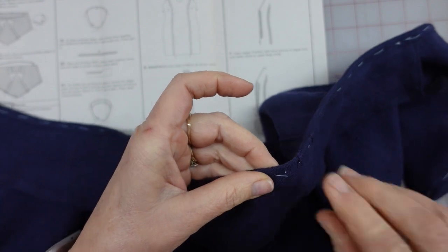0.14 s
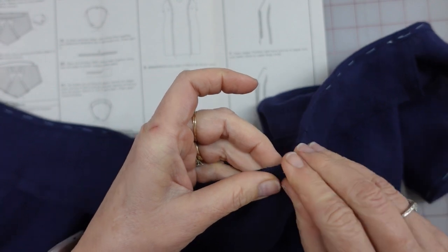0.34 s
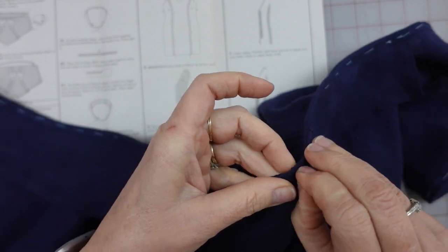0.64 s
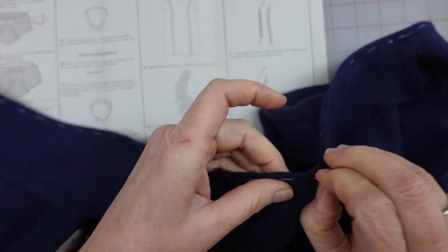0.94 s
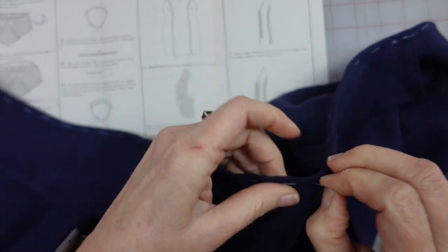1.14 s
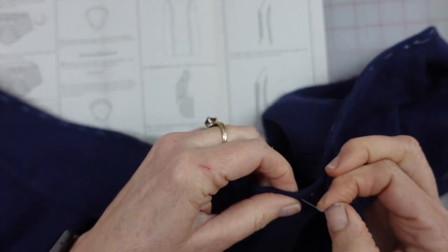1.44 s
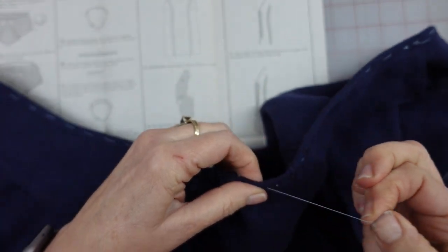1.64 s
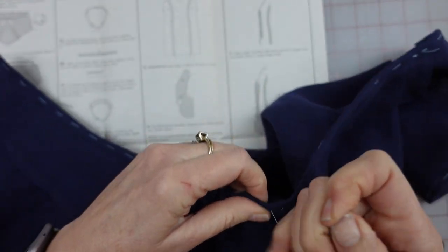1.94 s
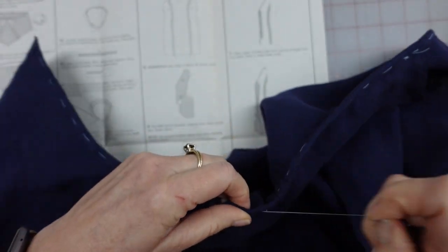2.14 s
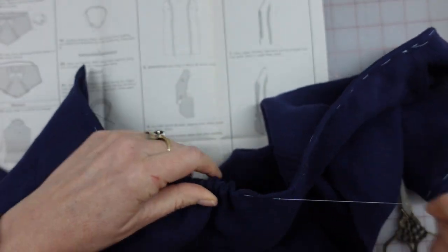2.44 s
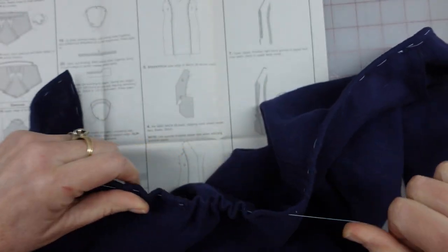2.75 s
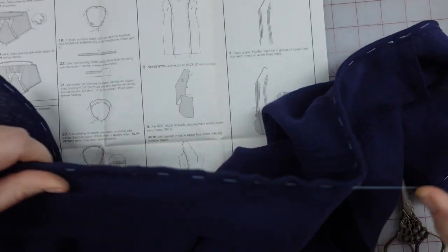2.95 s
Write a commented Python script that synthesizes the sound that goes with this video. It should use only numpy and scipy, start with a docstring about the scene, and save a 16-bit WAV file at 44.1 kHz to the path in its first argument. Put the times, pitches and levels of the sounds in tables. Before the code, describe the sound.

Hand-sewing thread rasps through fabric, close-miked in a small quiet room. A short clatter of scissors set down opens it, then light cloth handling, two hissing pulls, bunching with ticks, and a last bright pull.

```python
"""A thread is drawn through linen in three long hissing pulls: hand sewing, close to the microphone.
At the start scissors clatter as they are put down on the table; fingers brush and bunch the cloth.
Fibres tick, the thread snaps taut once, the cloth bumps softly, and a quiet room hums thinly behind.
Friction is dense random clicks, filtered and shaped by hand speed; bumps and scissors are decaying
sines; ticks are noise bursts. Both channels are nearly the same, with a short room echo."""
import sys
import numpy as np
from scipy import signal
from scipy.fft import rfft, irfft
from scipy.io import wavfile
from scipy.ndimage import uniform_filter1d

SR = 44100
rng = np.random.default_rng(int(sys.argv[2]) if len(sys.argv) > 2 else 0)


def log_audio(samples):
    """Write samples as a 16-bit WAV file to the path given in sys.argv[1]."""
    # one column per channel
    frames = np.atleast_2d(samples).T
    # limit to full scale, then quantise
    limited = np.clip(frames, -1, 1)
    pcm = np.round(limited * 32767).astype(np.int16)
    wavfile.write(sys.argv[1], SR, pcm)


N = 136710
T = np.arange(N) / SR  # seconds
SNAGS_PER_S = 7000  # fibres caught per second by a light touch


def amp(db):
    """Decibels to gain."""
    return 10 ** (np.asarray(db) / 20)


def unit(x):
    """Scale to rms 1."""
    return x / np.sqrt(np.mean(x ** 2))


def colour(x, points):
    """Causal minimum-phase filter through (Hz, dB) points, of unit power gain."""
    hz, db = np.array(points, float).T
    size = 2 * N
    f = np.maximum(np.fft.rfftfreq(size, 1 / SR), 1)
    gain = unit(amp(np.interp(np.log(f), np.log(hz), db)))
    # folding the cepstrum onto positive time makes the filter causal
    cepstrum = irfft(np.log(gain))
    cepstrum[1:N] *= 2
    cepstrum[N + 1:] = 0
    response = np.exp(rfft(cepstrum))
    return irfft(rfft(x, size) * response)[:N]


def walk(rate_hz):
    """Smooth random wander of rms 1, heading for a new value rate_hz times a second."""
    hold = max(int(SR / rate_hz), 2)
    steps = rng.standard_normal(N)[np.arange(N) // hold]
    return unit(uniform_filter1d(steps, hold))


def stroke(start_s, end_s, attack_s, release_s):
    """Speed of a hand movement: eases in, holds, eases out."""
    rise = (T - start_s) / attack_s
    fall = (end_s - T) / release_s
    ramp = np.clip(np.minimum(rise, fall), 0, 1)
    return np.sin(ramp * np.pi / 2) ** 1.2


def snags(rate_hz, spread_db):
    """Fibres slipping one by one: dense clicks, most small and a few large, rms 1."""
    size = amp(spread_db * np.minimum(rng.exponential(size=N), 5))
    slips = rng.random(N) < rate_hz / SR
    return unit(slips * size * rng.choice([-1, 1], N))


def burst(time_s, decay_s):
    """A short crackle of random signs, of peak near 1, dying away exponentially."""
    age = np.maximum(T - time_s, 0)
    return (T >= time_s) * np.exp(-age / decay_s) * rng.choice([-1, 1], N)


def room_tone():
    """Quiet, gently swaying air noise and the thin whine of an appliance, its pitches wavering."""
    # spectrum of the air in the room: freq_hz, relative_db
    air_spectrum = [(25, -1.5), (60, 2.5), (130, -0.5), (250, -2.5), (400, -1.5), (530, -1.5), (720, -6),
                    (1100, -9.5), (1600, -9), (2100, -11.5), (3000, -17), (5000, -16), (7500, -14.5),
                    (9300, -12.5), (11500, -18), (15500, -23)]
    # partials of the whine: freq_hz, level_db
    whine_partials = [(388, -61), (861, -60.5), (1249, -57.5), (2110, -65.5), (3747, -68), (4613, -68.5),
                      (5001, -66.5), (6250, -66)]
    air_db, sway_db = -44.5, 1.1
    air = colour(rng.standard_normal(N), air_spectrum) * amp(air_db + sway_db * walk(6.65))
    whine = 0
    for hz, db in whine_partials:
        cycles = np.cumsum(hz + 3 * walk(24.95)) / SR
        whine = whine + amp(db) * np.sqrt(2) * np.sin(2 * np.pi * cycles)
    return air + whine


def folds():
    """Layers of cloth drag over each other with a dull, lumpy rustle."""
    # folds shifted by the hands: start_s, end_s, attack_s, release_s, level_db, centre_hz
    fold_moves = [(0., 0.756, 0.025, 0.52, -37, 567), (0.61, 0.882, 0.088, 0.16, -40.5, 443),
                  (1.506, 1.73, 0.07, .05, -46, 486), (1.691, 1.956, 0.032, 0.2, -41, 530),
                  (1.94, 2.161, 0.038, 0.15, -35, 495), (2.125, 2.554, 0.053, 0.19, -41, 462),
                  (2.496, 2.737, 0.054, 0.084, -43, 430), (2.806, 3.062, 0.071, 0.15, -39, 500),
                  (3.022, 3.15, 0.084, .03, -38, 406)]
    # spectrum of any fold: multiple_of_centre, relative_db
    fold_shape = [(.06, -8.5), (.25, -3.5), (.5, -1), (.7, -2.5), (1, 2), (1.5, -4), (2.4, -12.5),
                  (6, -23.5), (24, -48)]
    out = 0
    for start, end, attack, release, db, hz in fold_moves:
        lumpy = amp(db + 0.72 * walk(45))
        drag = snags(2500, spread_db=2.5) * stroke(start, end, attack, release) * lumpy
        out = out + colour(drag, [(hz * ratio, level) for ratio, level in fold_shape])
    return out


def fingers():
    """Skin and needle graze the linen: a light, grainy hiss and the dry rasp of gathering cloth."""
    # strokes over the linen: start_s, end_s, attack_s, release_s, hiss_db, rasp_db
    finger_strokes = [(0., 0.375, .05, 0.22, -49, -51), (.12, 0.46, .06, 0.29, -64, -51.5),
                      (0.404, 0.658, 0.071, .015, -50.5, -62), (0.707, 0.917, 0.079, 0.039, -47, -68),
                      (1.127, 1.332, 0.025, 0.14, -42, -57), (1.163, 1.214, 0.044, .01, -39, -62),
                      (1.77, 1.874, 0.049, 0.027, -38, -56), (1.858, 2.022, 0.017, 0.12, -43, -49),
                      (2.098, 2.358, 0.12, 0.053, -35, -35.5), (2.335, 2.57, 0.012, 0.058, -43, -47),
                      (2.533, 2.68, .015, 0.11, -39, -41), (2.649, 2.84, 0.033, 0.031, -43, -47),
                      (2.715, 2.753, 0.024, 0.031, -47, -45.5)]
    # spectrum of the hiss: freq_hz, relative_db
    graze_spectrum = [(2500, -23.5), (5000, -12), (5900, -7.5), (7500, 0.5), (9000, 4), (10200, 4),
                      (11000, -5), (13000, -7.5), (15500, -13)]
    # spectrum of cloth gathering under the fingers: freq_hz, relative_db
    gather_spectrum = [(500, -11), (1200, -9.5), (1900, -8.5), (2200, 0.5), (2550, -2), (3000, -7),
                       (4000, -7.5), (4900, -9), (5700, -2.5), (6400, -4.5), (9000, -22.5)]
    uneven = amp(1.0 * walk(60))
    out = 0
    for column, spectrum in enumerate((graze_spectrum, gather_spectrum)):
        speed = sum(stroke(*row[:4]) * amp(row[4 + column]) for row in finger_strokes)
        friction = snags(SNAGS_PER_S, spread_db=2.0) * speed * uneven
        out = out + colour(friction, spectrum)
    return out


def scissors():
    """Several quick contacts on the table, each a crack and a short ring, some duller than others."""
    # contacts as the scissors settle: time_s, level_db, hardness_hz (low-pass corner)
    contacts = [(.0005, 3.5, 1500), (.005, 0.5, 4000), (0.0144, -2, 3500), (0.0203, 2.5, 1390),
                (0.027, -3.5, 2500), (0.04, -2.5, 1800), (.043, -12, 2800), (0.05, -3.5, 1400),
                (0.059, -11, 3000), (0.082, -8.5, 1500)]
    # ringing modes of the metal: freq_hz, relative_db, t60_s
    metal_modes = [(550, -11.5, 0.28), (690, -15, 0.19), (910, -11.5, 0.16), (1074, 1.5, 0.16),
                   (1114, -2.5, 0.092), (1258, -0.5, 0.093), (1403, -5, .10), (1835, -22, 0.072),
                   (1995, -3, 0.14), (2440, -9, 0.044), (2680, -20, 0.06)]
    # spectrum of the crack: freq_hz, relative_db
    crack_spectrum = [(100, -11), (500, -2), (1100, 1), (2700, 2.5), (3700, -12.5), (6500, -9),
                      (12000, -47)]
    ring_db, crack_db, crack_decay_s = -28, -21.5, .007
    out = 0
    for time, db, hard_hz in contacts:
        age = np.maximum(T - time, 0)
        ring = 0
        for hz, level, t60 in metal_modes:
            # each contact excites the modes slightly off pitch, with either sign
            detuned_hz = hz * (1 + 0.0084 * rng.standard_normal())
            mode = amp(level - 60 * age / t60) * np.sin(2 * np.pi * detuned_hz * age)
            ring = ring + mode * rng.choice([-1, 1])
        crack = colour(burst(time, crack_decay_s), crack_spectrum)
        hit = amp(ring_db) * ring + amp(crack_db) * crack
        out = out + amp(db) * signal.lfilter(*signal.butter(1, hard_hz, fs=SR), hit)
    return out


def ticks():
    """Fibres let go with a tiny bright snap, or several at once with a short crackle."""
    # fibres catching and letting go: time_s, energy_db, decay_s
    releases = [(0.098, -18, .0005), (.897, -22, .00003), (1.881, -19, .0007), (2.015, -18, .00003),
                (2.4101, -6, .00002), (2.5883, -9, 0.00004), (2.644, -5.5, 0.0042), (2.738, -15.5, 0.0018)]
    # spectrum of the snap: freq_hz, relative_db
    snap_spectrum = [(500, -15), (2500, -8), (5000, -18), (7000, -4), (8700, 0.5), (10000, -5),
                     (12000, -13), (15500, -23)]
    out = 0
    for time, db, decay in releases:
        snap = burst(time, decay)
        out = out + amp(db) * snap / np.sqrt(np.sum(snap ** 2))
    return colour(out, snap_spectrum)


def slides():
    """Needle and slack thread slide slowly through the weave with a softer, lower hiss."""
    # slow movements: start_s, end_s, attack_s, release_s, level_db
    slow_moves = [(0.874, 1.081, 0.11, .04, -41.5), (1.377, 1.52, .09, 0.031, -43.5),
                  (1.463, 1.63, 0.077, 0.056, -35)]
    # spectrum of the hiss: freq_hz, relative_db
    slack_spectrum = [(2500, -12.5), (4600, -11), (5600, -0.5), (6400, -0.5), (7800, 0.5), (9500, -0.5),
                      (11000, -8.5), (13000, -11), (15500, -18)]
    speed = sum(stroke(*row[:4]) * amp(row[4]) for row in slow_moves)
    return colour(snags(2 * SNAGS_PER_S, spread_db=3.0) * speed, slack_spectrum)


def bumps():
    """The cloth tugs tight or drops on the table: a heavily damped swing."""
    # bumps and tugs of cloth and thread: time_s, level_db, pitch_hz, t60_s
    swings = [(1.199, -27, 109, 0.028), (1.645, -28.5, 30.4, 0.11), (1.880, -33.5, 806, 0.011),
              (2.048, -26.5, 66, 0.075), (2.116, -24.5, 108, 0.039), (2.23, -27.5, 320, 0.023),
              (2.6425, -9.5, 410, 0.0049), (2.656, -30, 50, 0.052), (2.794, -30, 34.5, 0.076)]
    out = 0
    for time, db, hz, t60 in swings:
        age = np.maximum(T - time, 0)
        onset = 2 * (1 - np.exp(-2 * age * hz))  # soft start
        out = out + amp(db - 60 * age / t60) * np.sin(2 * np.pi * hz * age) * onset
    return out


def thread():
    """The twisted thread scrapes over the weave, unevenly, louder with speed."""
    # pulls: start_s, end_s, attack_s, release_s, hiss_db, rasp_db, sizzle_db
    thread_pulls = [(1.498, 1.757, 0.06, 0.059, -34.5, -45.5, -45),
                    (1.976, 2.351, 0.074, 0.17, -27.5, -40, -37),
                    (2.794, 3.133, 0.072, 0.08, -32.5, -52, -33.5)]
    # spectrum of the main hiss: freq_hz, relative_db
    hiss_spectrum = [(2500, -16), (4800, -15.5), (5650, -1.5), (6400, -1.5), (7100, 0.5), (7900, 2.5),
                     (8600, 1), (9700, 2.5), (10900, -6), (13000, -11), (15500, -16)]
    # spectrum of the lower rasp: freq_hz, relative_db
    rasp_spectrum = [(300, -11.5), (1000, -8), (1600, -3), (2300, 3.5), (3200, -4), (4300, 0.5), (5600, -3),
                     (8000, -30)]
    # spectrum of the top sizzle: freq_hz, relative_db
    sizzle_spectrum = [(5500, -12), (7500, -5), (9000, 7), (10200, 5), (11500, 0), (13300, -1), (15500, -9)]
    uneven = amp(1.0 * walk(29.75) + 0.97 * walk(350))
    out = 0
    for column, spectrum in enumerate((hiss_spectrum, rasp_spectrum, sizzle_spectrum)):
        speed = sum(stroke(*row[:4]) * amp(row[4 + column]) for row in thread_pulls)
        friction = snags(2 * SNAGS_PER_S, spread_db=2) * speed * uneven
        out = out + colour(friction, spectrum)
    return out


def room_echo(near):
    """The room answers with a decaying noise tail that starts after 3 ms."""
    echo_db, t60_s = -14, .4
    tail = rng.standard_normal(N) * amp(-60 * T / t60_s) * (T > .003)
    tail = tail / np.sqrt(np.sum(tail ** 2))
    return amp(echo_db) * signal.fftconvolve(near, tail)[:N]


def side_noise():
    """Very faint steady noise, of opposite sign in the two channels."""
    # spectrum of the side noise: freq_hz, relative_db
    side_spectrum = [(30, 0), (150, 4), (450, 3), (800, -2), (1500, -16), (4000, -7.5), (9000, -33),
                     (15000, -10.5)]
    return amp(-64.5) * colour(rng.standard_normal(N), side_spectrum)


def scene():
    """Close sources, their echo and the room, nearly the same in both channels."""
    near = folds() + fingers() + scissors() + ticks() + slides() + bumps() + thread()
    mid = near + room_echo(near) + room_tone()
    side = side_noise()
    return np.array([mid + side, mid - side])


def record(dry):
    """The recorder cuts the top steeply above 15.8 kHz."""
    top_cut = signal.ellip(12, .2, 80, 15800, fs=SR, output="sos")
    return signal.sosfilt(top_cut, dry)


dry = scene()
out = record(dry)
log_audio(out)
```